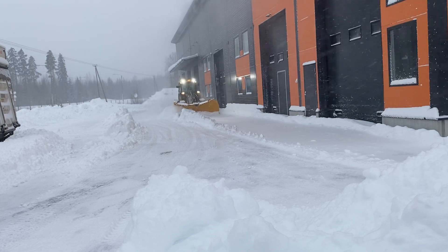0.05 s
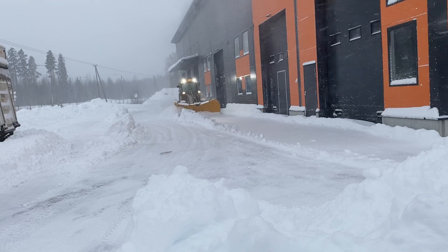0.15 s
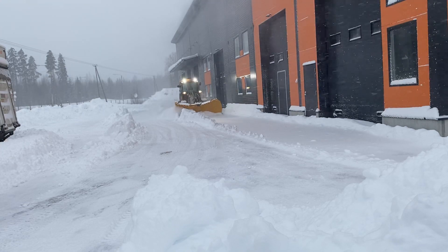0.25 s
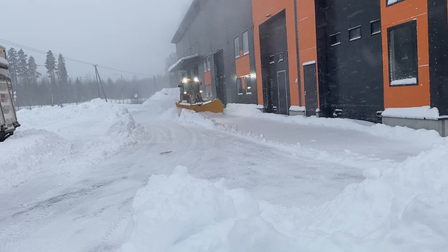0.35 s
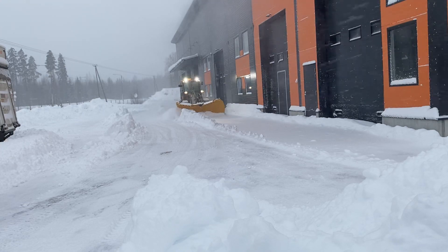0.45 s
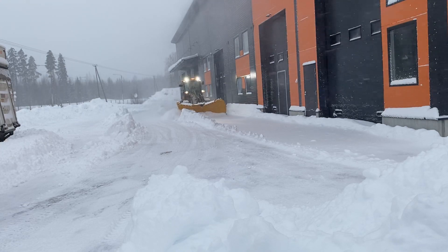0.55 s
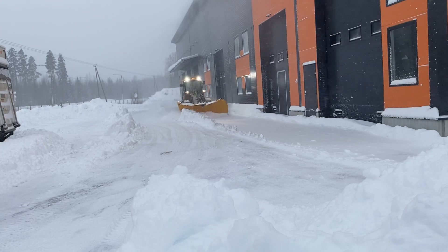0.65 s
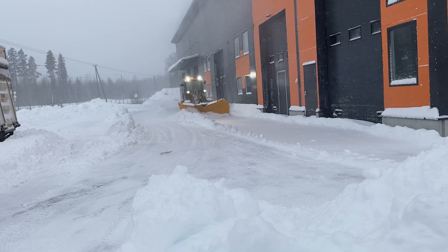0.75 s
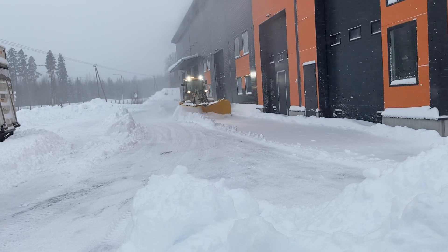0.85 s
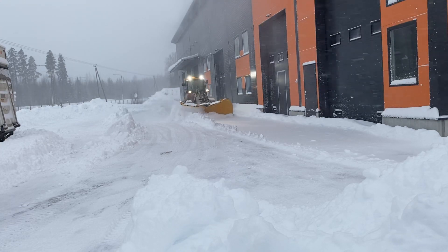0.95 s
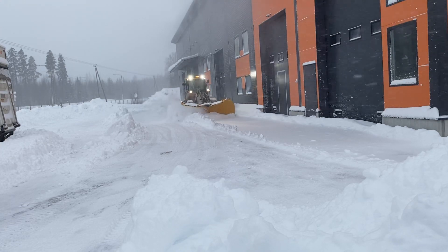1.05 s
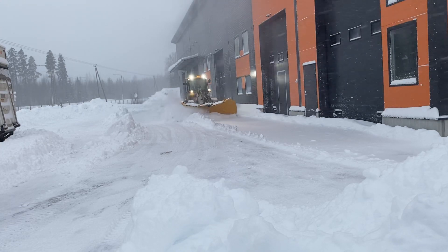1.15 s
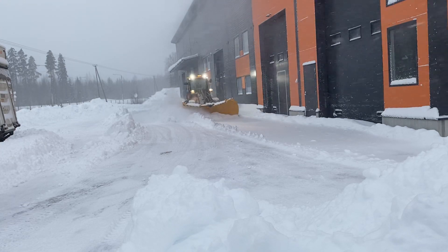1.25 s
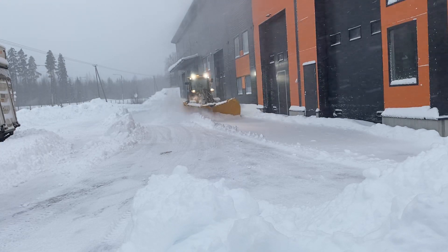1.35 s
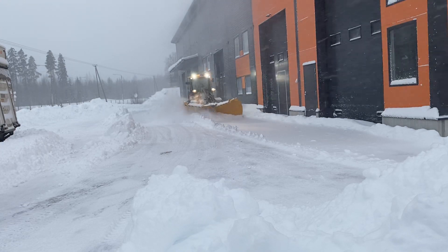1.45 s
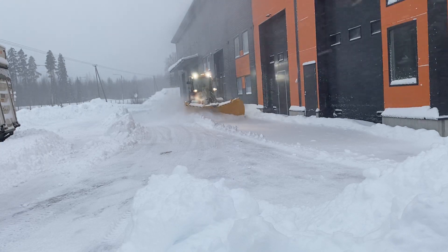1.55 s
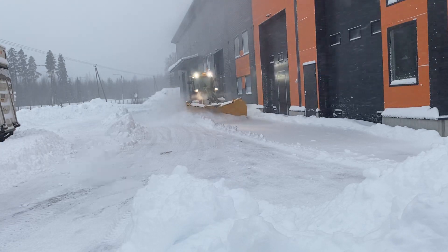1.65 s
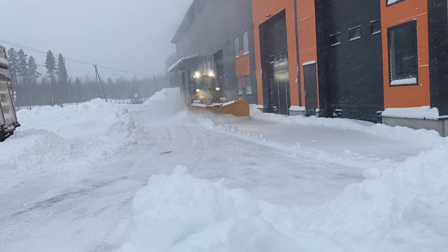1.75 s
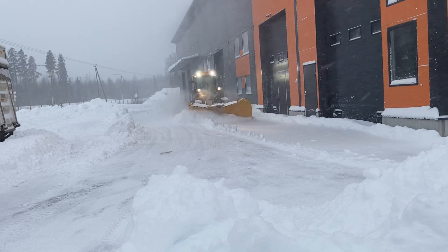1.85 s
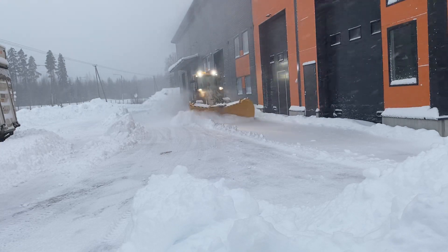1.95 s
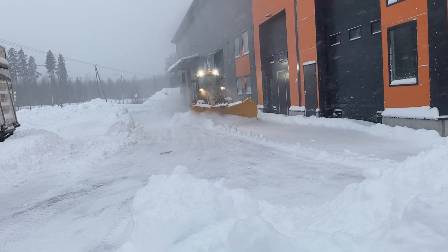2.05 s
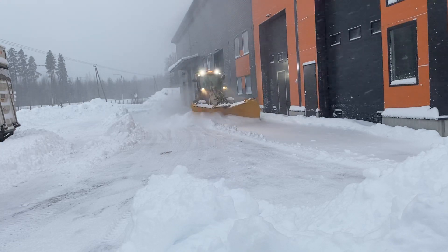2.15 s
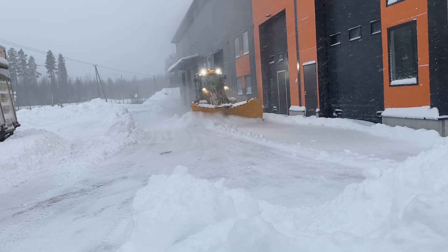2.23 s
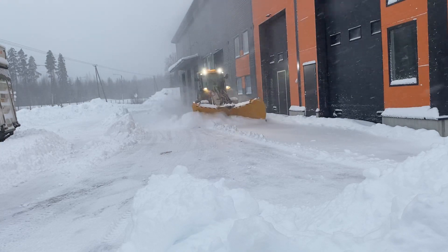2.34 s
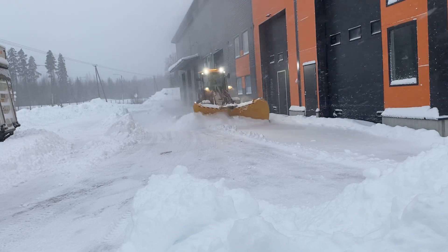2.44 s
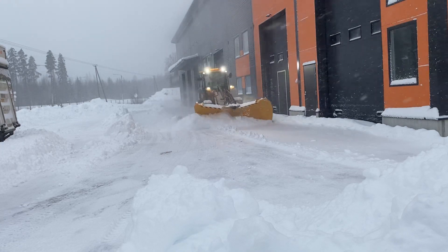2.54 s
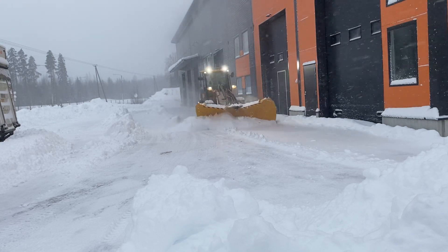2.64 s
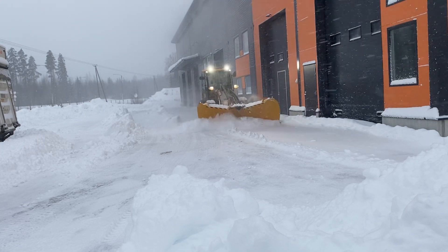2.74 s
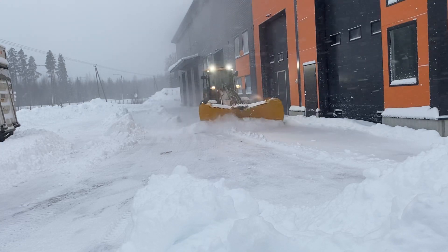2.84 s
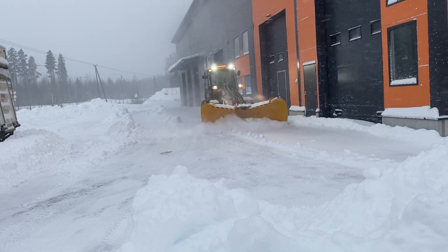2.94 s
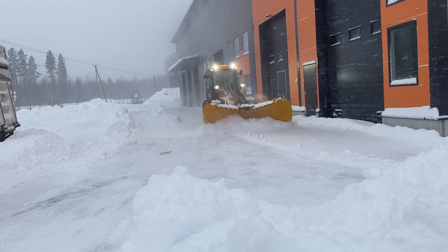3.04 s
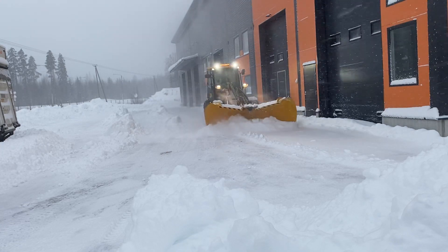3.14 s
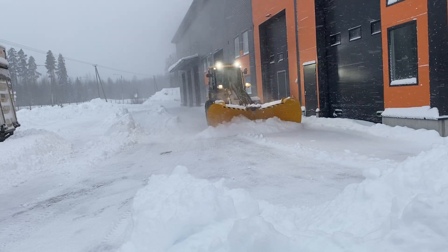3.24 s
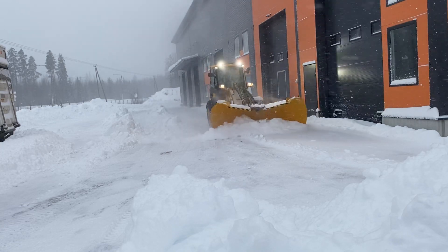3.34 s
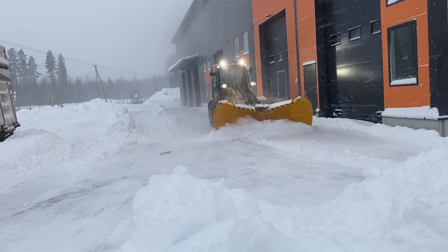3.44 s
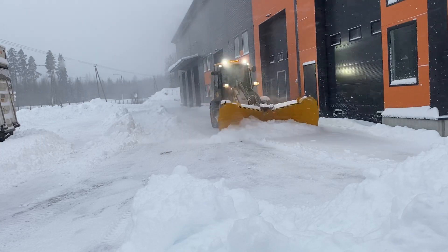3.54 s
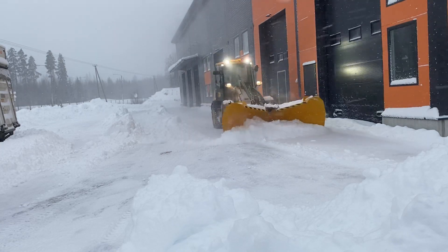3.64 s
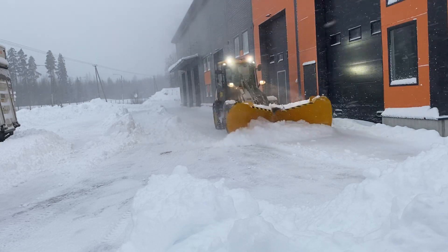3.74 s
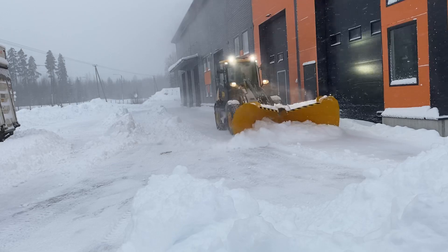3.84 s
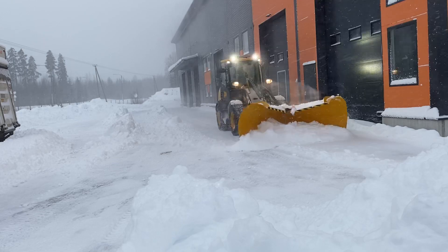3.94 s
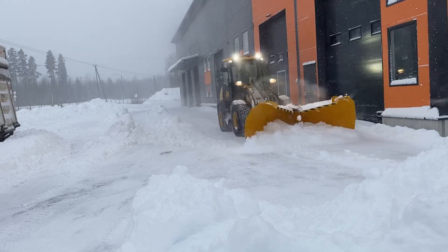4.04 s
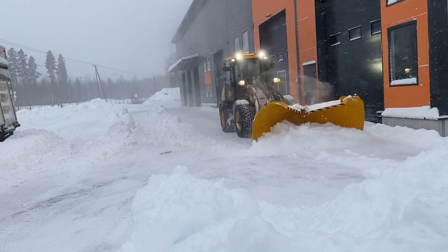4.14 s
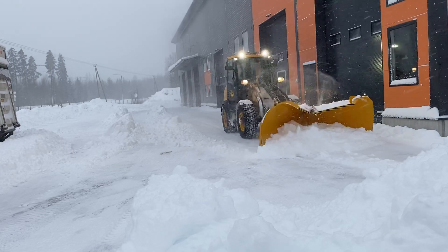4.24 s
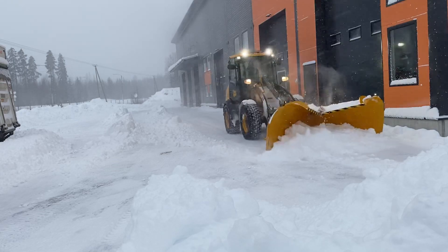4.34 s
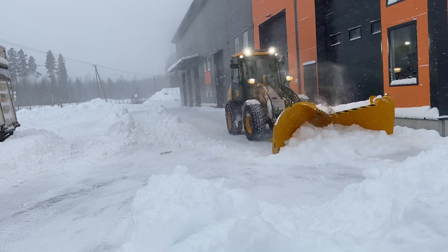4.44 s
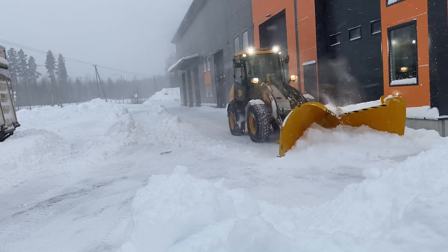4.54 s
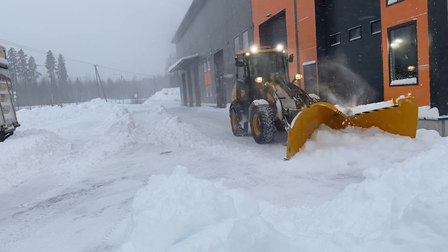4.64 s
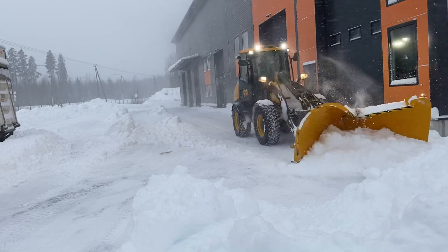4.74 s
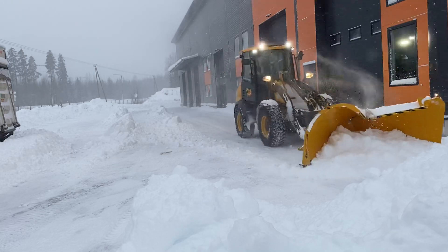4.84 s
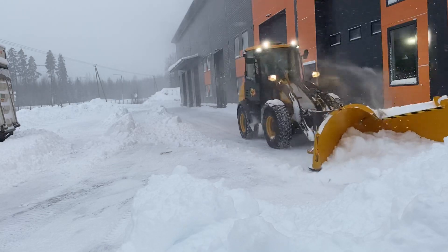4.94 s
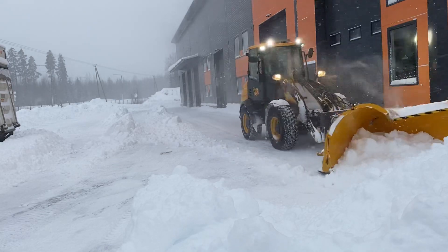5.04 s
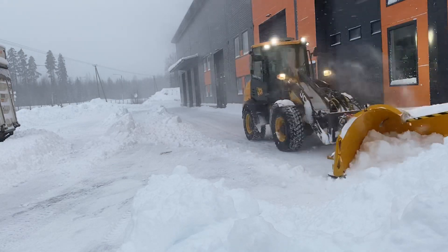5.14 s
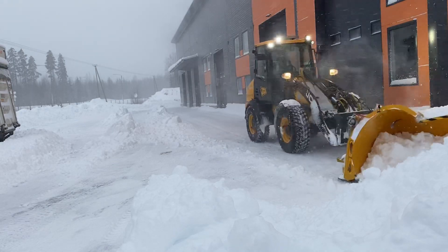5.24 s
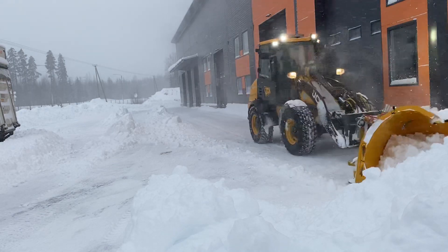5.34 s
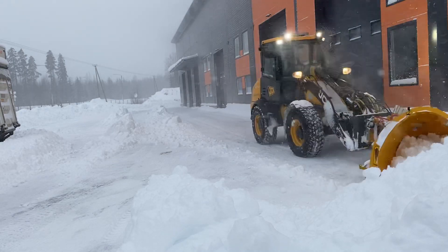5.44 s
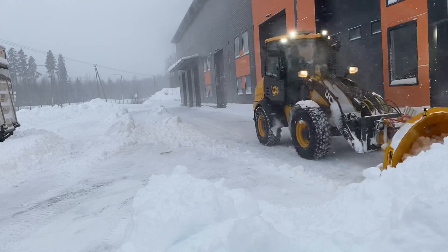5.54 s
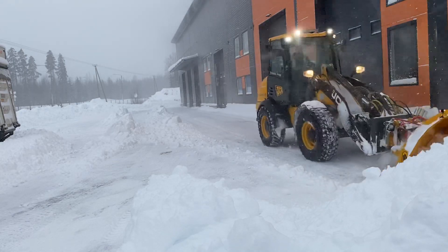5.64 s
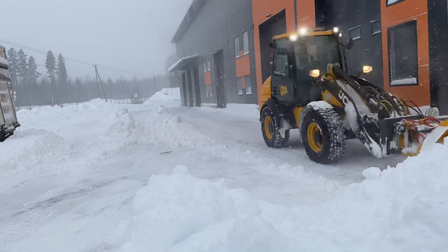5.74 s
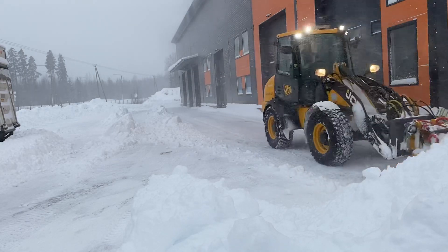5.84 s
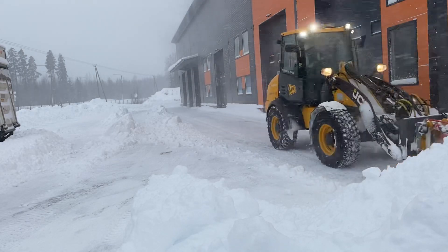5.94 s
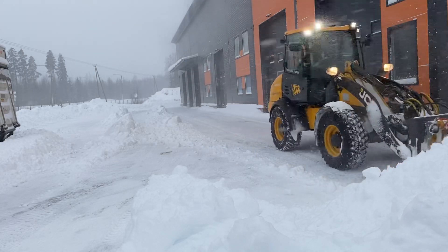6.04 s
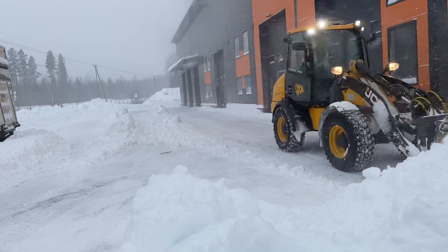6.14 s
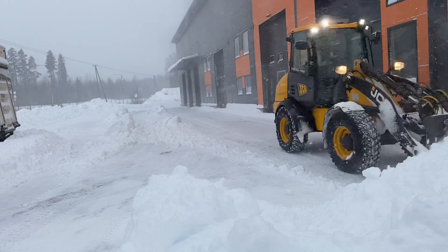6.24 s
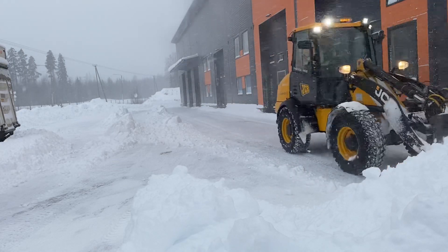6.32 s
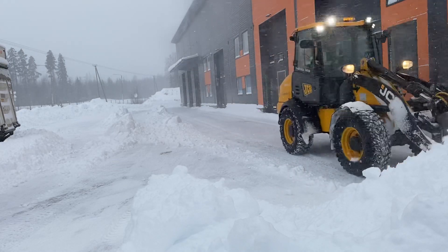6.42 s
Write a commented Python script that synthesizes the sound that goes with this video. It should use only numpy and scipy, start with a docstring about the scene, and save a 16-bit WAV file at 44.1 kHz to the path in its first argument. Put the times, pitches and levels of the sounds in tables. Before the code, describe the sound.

Wind rumbles and pops on a hand-held microphone while a distant plough scrapes softly across ice. The loader comes nearer, its rough edge noise swelling with gritty crackle and snow hiss. Hollow clanks, dull thuds and bright link rattles become dense around the middle and continue beside the listener. Finally only fading scraping, a lower diesel throb, thin hydraulic whine and light gusts remain in the open yard.

```python
"""Wheel loader ploughing a frozen yard

A wheel loader pushes a steel snow blade towards a hand-held camera and slows beside it.
The blade is noise stuttering over ice: it grinds, crackles, knocks and rattles through resonances of the steel.
The diesel drones as orders of its firing rate under a puffed roar, and its pump whines as sines.
Wind noise, short flutters and falling swings buffet the two microphone ports.
"""
import sys
import numpy as np
from scipy import signal
from scipy.fft import rfft, irfft
from scipy.io import wavfile
from scipy.ndimage import uniform_filter1d

SR = 44100
rng = np.random.default_rng(int(sys.argv[2]) if len(sys.argv) > 2 else 0)


def master_out(mix):
    """Clip the mix to full scale and print it as 16-bit PCM to the path in sys.argv[1]."""
    frames = np.transpose(np.atleast_2d(mix))
    ceiling = np.clip(frames, -1, 1)
    pcm = np.round(ceiling * 32767).astype(np.int16)
    wavfile.write(sys.argv[1], SR, pcm)


N = 285768  # samples, 6.48 s


def amp(db):
    """Decibels to gain."""
    return 10 ** (np.asarray(db) / 20)


def evened(x):
    """Scales to rms 1."""
    return x / np.sqrt(np.mean(x ** 2) + 1e-20)


def columns(rows):
    """Curve columns of a timed table, at every sample."""
    s, *values = np.transpose(rows)
    return [np.interp(np.arange(N) / SR, s, v) for v in values]


def coloured(x, points):
    """Gives x the spectrum of a (Hz, dB) table, rms 1."""
    f, db = np.transpose(points)
    hz = np.fft.rfftfreq(N, 1 / SR)
    gain = amp(np.interp(np.log(hz + 1), np.log(f + 1), db, -90, -90))
    return evened(irfft(rfft(x) * gain, N))


def lumps(per_s, channels=1):
    """Smooth chance of rms 1 that turns about per_s times a second."""
    span = max(round(SR / per_s / 2), 1)
    smooth = uniform_filter1d(rng.standard_normal((channels, N)), span)
    return evened(uniform_filter1d(smooth, span))


def resonate(x, hz, width):
    """Two-pole resonance of gain 1."""
    return signal.lfilter(*signal.iirpeak(hz, hz / width, SR), x)


def glide(x, hz, width):
    """A resonance that follows the curve hz: shift down, smooth twice, shift back."""
    turn = np.exp(2j * np.pi * np.cumsum(hz) / SR)
    r = np.exp(-np.pi * width / SR)
    return 2 * (turn * signal.lfilter([(1 - r) ** 2], [1, -2 * r, r * r], x / turn)).real


def bandpass(order, low_hz, high_hz):
    """Butterworth band-pass sections."""
    return signal.butter(order, (low_hz, high_hz), "band", fs=SR, output="sos")


def add(mix, s, sound):
    """Mixes a two-row sound in at time s."""
    part = mix[:, round(s * SR):][:, :sound.shape[1]]
    part += sound[:, :part.shape[1]]


def sides(pan_db):
    """Left and right gains from left minus right dB."""
    return amp(np.array([[.5], [-.5]]) * pan_db)


# the push across the yard, before mix gains: start_s, scrape_db, rumble_db, hiss_db
PUSH = [(0, -45.5, -51, -64), (.45, -42.5, -53, -58), (.74, -43.5, -64, -57), (1.05, -43, -40.5, -57),
        (1.17, -38.5, -42, -55), (1.25, -37.5, -41, -61), (1.32, -39.5, -44.5, -58),
        (1.42, -35.5, -37.5, -50), (1.52, -32, -33.5, -52.5), (1.66, -41.5, -45.5, -53.5),
        (2.09, -40, -44, -52), (2.3, -35, -37, -45.5), (2.45, -42.5, -39.5, -51), (2.69, -35, -35.5, -48),
        (2.85, -39.5, -37.5, -52), (3, -31.5, -36.5, -50.5), (3.25, -38.5, -37, -43.5),
        (3.48, -33.5, -35.5, -42.5), (3.75, -27.5, -29, -41.5), (3.9, -29.5, -27.5, -38),
        (4.06, -31.5, -34.5, -49), (4.35, -31.5, -29.5, -48.5), (4.56, -39, -36, -50),
        (4.71, -34, -34, -46), (4.88, -40.5, -28.5, -50), (4.96, -44, -38, -57), (5.07, -29, -33, -48),
        (5.22, -38.5, -31.5, -53), (5.33, -35, -44, -52), (5.45, -37.5, -37.5, -51),
        (5.62, -43, -42, -56.5), (6.06, -41.5, -45.5, -59), (6.2, -47, -41, -54), (6.48, -44, -43, -52.5)]
# spectra of blade rumble, edge scrape and snow hiss: pitch_hz, level_db (relative, per Hz)
RUMBLE = [(88, -21), (150, 6), (204, 0), (541, 2.5), (678, -2), (889, -10), (965, -11.5), (1300, -13),
          (1690, -98), (2860, -120)]
SCRAPE = [(410, -48), (700, 7.5), (1060, -5), (1130, -4.5), (1380, -4.5), (1500, -2), (1630, -1),
          (1760, -0.5), (1900, -1.5), (2520, -12), (3250, -12), (4200, -19.5), (5460, -32), (9240, -120)]
HISS = [(2200, 11.5), (3200, 4), (5000, 4), (5800, -3), (7000, -2), (9000, -8), (12000, -11.5),
        (13000, -17), (15000, -26), (16500, -42)]
# the blade turning side-on: start_s, upper_ring_db (relative), thud_hz
SIDE_ON = [(0, -40, 760), (2.2, -3, 730), (3.5, -24, 714), (4.1, -22, 799.4), (4.6, -6.5, 707.2),
           (5.0, -9, 590), (5.3, -3, 565), (5.6, -10, 600), (5.9, -16, 620), (6.48, -28, 645)]
HOLLOW_HZ = 1290  # centre of a wandering resonance
UPPER_HZ, UPPER_WIDTH_HZ = 2410, 910


def upper_ring(x):
    """The blade's broad upper resonance, passed twice."""
    once = resonate(x, UPPER_HZ, UPPER_WIDTH_HZ)
    return resonate(once, UPPER_HZ, UPPER_WIDTH_HZ)


def grind():
    """The edge stutters over ice, more roughly the harder it bites; the curved steel colours the scrape and rings."""
    scrape_db, rumble_db, hiss_db = columns(PUSH)
    bite = np.clip((scrape_db + 48.5) / 14, .1, 1)
    slip = bite * (lumps(20.6) + 0.16 * lumps(97))
    rumble_swell = amp(2.4 * slip + 1.27 * bite * lumps(38))
    rumble = coloured(rumble_swell * rng.standard_normal((2, N)), RUMBLE)

    # ice lumps crushed one by one, about 90 a second
    crumbs = amp(4.15 * np.minimum(rng.exponential(1, N), 4)) * (rng.random(N) < 90 / SR)
    crunch = signal.lfilter([1], [1, -np.exp(-1 / (0.0097 * SR))], crumbs)
    scrape_swell = (1 + 0.24 * bite * crunch) * amp(1.54 * slip)
    scrape = coloured(scrape_swell * rng.standard_normal((2, N)), SCRAPE)

    ring = evened(blade_ring(scrape + rumble))
    hollow = evened(glide(scrape, HOLLOW_HZ * (1 + 0.036 * lumps(2.8)[0]), 690))
    upper = amp(columns(SIDE_ON)[0]) * evened(upper_ring(scrape))

    grit = amp(1.1 * np.minimum(rng.exponential(1, N), 4)) * (rng.random(N) < .15)
    hiss_swell = amp(1.9 * slip + 1.44 * lumps(22)) * grit * (1 + 0.3 * bite * crunch)
    hiss = coloured(hiss_swell * rng.standard_normal((2, N)), HISS)

    steel = 0.5 * scrape + 0.15 * ring + 0.29 * hollow + 0.28 * upper
    return amp(rumble_db) * rumble + amp(scrape_db) * steel + 0.78 * amp(hiss_db) * hiss


# modes of the steel blade: pitch_hz, width_hz (at least 25 is used), level_db (relative)
BLADE = [(701.6, 43, 5), (890, 15, 5), (1157, 45, 5.5), (1350, 31, -7), (1732, 34, 4), (1950, 63, 0),
         (2367, 110, -3.5)]
FLEX = .018  # rms share by which each mode drifts


def blade_ring(x):
    """The blade's modes drift apart at random, as steel flexing under load."""
    return sum(amp(db) * glide(x, hz * (1 + FLEX * lumps(5.6)[0]), max(width, 25))
               for hz, width, db in BLADE)


def crackle():
    """Grit snaps under the edge; each grain pings briefly at one of many pitches."""
    size = amp(3.9 * np.minimum(rng.exponential(1, N), 4)) * (rng.random(N) < 260 / SR)
    pitches, t, out = np.geomspace(1800, 7400, 24), np.arange(900) / SR, np.zeros((2, N))
    which = rng.integers(0, len(pitches), N)
    for k, hz in enumerate(pitches):
        ping = np.sin(2 * np.pi * hz * t) * amp(-60 * t / 0.064 - 9.1 * np.log2(hz / 4000))
        grains = signal.oaconvolve(size * (which == k), ping)[:N]
        out += grains * rng.uniform(-1.4, 1, (2, 1))
    return amp(columns(PUSH)[2] - 10.0) * evened(out * amp(1.1 * lumps(6.1)))


# the edge catches on ice, levels before mix gains: start_s, clank_db, clank_hz, thud_db (relative)
KNOCKS = [(0.9485, -28, 1540, -5), (.9819, -25.5, 1460, -2), (1.4109, -26.5, 1380, -14),
          (1.4452, -26, 1550, -18), (1.4697, -19.5, 1370, -25), (1.5848, -23, 1340, -1),
          (2.6201, -26, 1140, -2), (2.6706, -28, 1170, -22), (2.6975, -24, 1460, -25),
          (2.7659, -32, 1590, -15), (2.93, -27, 1180, 2), (3.0208, -16.5, 1200, -1.5),
          (3.0631, -24, 1420, -15), (3.097, -26, 1600, -23), (3.18, -28.5, 1440, -16),
          (3.2354, -21, 1400, -11), (3.3316, -25, 1104, -4), (3.351, -26, 1140, 5.5),
          (3.399, -27.5, 1340, -18), (3.4943, -24, 1880, -5), (3.565, -20, 1460, 1),
          (3.6222, -13, 1150, -0.5), (3.6788, -21.5, 1150, 3.5), (3.697, -19, 1350, 2.5),
          (3.7304, -13, 1110, 2), (3.7626, -14, 1470, -3), (3.811, -23, 1130, 3), (3.8426, -24, 1560, -13),
          (3.8753, -23, 1350, 9), (3.9498, -17.5, 1100, 1.5), (4.0648, -31, 1680, 5),
          (4.1, -13.5, 1710, -2), (4.1601, -24, 1611, -0.5), (4.2031, -26, 1400, 2), (4.2191, -29, 1820, 4),
          (4.25, -18.5, 1734, 3), (4.2967, -24, 1950, 5), (4.3444, -15, 1830, -1),
          (4.398, -19.5, 1840, 5.5), (4.452, -9.5, 1436, -9.5), (4.5572, -17, 1517, -4),
          (4.706, -18, 1620, -5), (4.8043, -20, 1380, 6), (4.8666, -20, 1300, 2),
          (4.9045, -25.5, 1318, 3.5), (4.963, -32, 1410, 0), (5.004, -25.5, 1900, 0),
          (5.057, -23.5, 2028, -20), (5.0722, -21.5, 1550, -8), (5.0916, -13.5, 1530, 2),
          (5.1285, -23.5, 1325, 8.5), (5.158, -16, 1441, -0.5), (5.181, -20.5, 1190, 12),
          (5.2481, -15.5, 1460, 5), (5.3483, -20, 1520, 4.5), (5.3928, -24.5, 1280, 6.5)]
# the blade swings to the right: start_s, pan_db (left minus right)
BLADE_PAN = [(0, -1), (4.4, 1), (4.7, -4.5), (6.48, -5)]
CHATTER_S, KNOCK_T60_S = 0.0095, 0.076  # the jolt's hold, then its 60 dB decay
BOUNCE_S = 0.0075  # from first strike to bounce
CRACK_FROM_DB, CRACK_DB = -13, -25  # clank level around which hardness sets in; gain before hardness
# opening ping: gain before hardness, decay, starting pitch over clank pitch
STRIKE_DB, STRIKE_S, STRIKE_ABOVE = 7, 0.0021, 1.44


def knocks():
    """A chattering jolt rings a clank, upper ring, thud and blade modes; hard ones crack more."""
    out, jolts, cracks = np.zeros((3, 2, N))
    t = np.arange(5000) / SR
    when, upper, thud = np.transpose(SIDE_ON)
    for s, db, hz, thud_db in KNOCKS:
        pan = sides(np.interp(s, *np.transpose(BLADE_PAN)))
        thud_hz = np.interp(s, when, thud)
        hard = 1 / (4.5 + np.exp((CRACK_FROM_DB - db) / 6.4))

        shape = amp(db - 60 * np.maximum(t - CHATTER_S, 0) / KNOCK_T60_S)
        shape = shape + 0.2 * amp(db) * np.exp(-t / 0.00076)
        jolt = pan * shape * rng.standard_normal((2, len(t)))
        jolt[:, 0] += 7.9 * hard * amp(db) * pan[:, 0]  # the first strike
        jolt[:, round(BOUNCE_S * SR)] -= 3.6 * hard * amp(db) * pan[:, 0]  # and its bounce

        clank = 1.7 * resonate(resonate(jolt, hz, 660), hz, 660) + 1.52 * resonate(jolt, hz, 49)
        top = amp(np.interp(s, when, upper)) * upper_ring(jolt)
        low = signal.sosfilt(bandpass(2, 0.66 * thud_hz, 1.317 * thud_hz), jolt)
        add(out, s, clank + top + 2.14 * amp(thud_db) * low)

        # the ping slides down to the clank's pitch
        turns = hz * np.cumsum(1 + (STRIKE_ABOVE - 1) * np.exp(-t / STRIKE_S)) / SR
        ping = np.sin(2 * np.pi * turns) * np.exp(-t / STRIKE_S)
        add(out, s, amp(db + STRIKE_DB) * hard * pan * ping)
        add(jolts, s, jolt)
        add(cracks, s, amp(CRACK_DB) * hard * jolt * np.exp(-t / 0.00073))
    out += blade_ring(jolts)
    body = signal.sosfilt(signal.butter(4, 3400, fs=SR, output="sos"), out)
    return body + signal.sosfilt(bandpass(2, 2400, 12000), cracks)


# loose steel links rattle, levels before mix gains: start_s, jingle_db, ring_hz, tick_db
RATTLES = [(0.688, -45, 4930, -58), (0.9817, -39, 3580, -80), (1.359, -43, 6300, -67),
           (1.469, -30, 3220, -62), (1.584, -43, 3570, -76), (1.8954, -28.5, 7200, -55),
           (2.0088, -33.5, 3940, -77), (2.109, -32, 7060, -66), (2.173, -46, 3900, -49.5),
           (2.244, -31, 4000, -56), (2.286, -31, 6900, -64), (2.297, -22.5, 4450, -59),
           (2.313, -28, 6900, -64), (2.33, -36, 6900, -68), (2.41, -46, 6900, -75), (2.457, -36, 6900, -75),
           (2.49, -35, 6900, -68), (2.708, -28, 6700, -53), (2.7794, -38, 3380, -50),
           (2.8733, -34, 3330, -48), (3.0092, -37, 3387, -45.5), (3.064, -41, 3220, -49),
           (3.18, -30, 4730, -51), (3.2082, -33, 4770, -57), (3.251, -27.5, 4730, -51),
           (3.2773, -26, 4690, -55), (3.322, -28.5, 3386, -52), (3.346, -23.5, 4130, -49),
           (3.413, -27, 4580, -46), (3.435, -29, 5000, -46.5), (3.4936, -16, 3810, -50),
           (3.509, -32, 3680, -62), (3.626, -26, 4510, -53), (3.671, -28.5, 3420, -44.5),
           (3.694, -21, 3400, -47), (3.7623, -24, 3630, -65), (3.7877, -21.5, 5050, -51),
           (3.8403, -17, 4480, -48), (3.852, -22, 5070, -53), (3.924, -25.5, 4170, -53),
           (3.993, -33, 5030, -59), (4.008, -31, 4560, -46.5), (4.016, -29, 4605, -59),
           (4.05, -32, 4396, -52), (4.1, -20, 3350, -68), (4.111, -39, 4480, -65), (4.2147, -44, 4200, -52),
           (4.241, -25, 4056, -52), (4.26, -27.5, 4900, -47.5), (4.2947, -28, 3600, -66),
           (4.305, -38, 4500, -48.5), (4.33, -30, 3600, -64), (4.3409, -26, 4300, -47.5),
           (4.349, -23.5, 3630, -69), (4.3973, -29, 3844, -70), (4.4261, -44, 4270, -66),
           (4.451, -17.5, 3050, -73), (4.461, -35, 5180, -72), (4.555, -34, 3990, -54),
           (4.706, -31, 3950, -66), (4.7446, -27, 3597, -44), (4.783, -32, 4580, -66),
           (4.8674, -54, 3656, -47), (5.074, -42, 3230, -52), (5.089, -28, 4100, -56),
           (5.15, -29, 3960, -65), (5.18, -35, 3900, -59), (5.316, -32, 4570, -65), (5.342, -29, 4520, -56)]
# what the loose links ring with: pitch_hz, width_hz, level_db (relative, before chance)
LINKS = [(3330, 220, -1), (3900, 230, -4.5), (4480, 310, -4), (4900, 110, -6), (6300, 160, -5),
         (6700, 180, -11), (7100, 200, -7)]
JINGLE_HOLD_S, RATTLE_T60_S = 0.0032, 0.076  # the burst's hold, then its 60 dB decay
TICK_S = 0.0028  # decay constant of the tick's accent


def rattles():
    """Short bright bursts ring the links, each mode more or less by chance, with a tick above."""
    out, t = np.zeros((2, N)), np.arange(4000) / SR
    low, high = bandpass(3, 2800, 7430), bandpass(3, 7600, 12400)
    link_hz = np.transpose(LINKS)[0]
    for s, db, hz, top_db in RATTLES:
        rise_s = np.interp(max(db, top_db + 22), (-30, -21), (.004, .0004))  # light touches start softly
        decay = amp(-60 * np.maximum(t - JINGLE_HOLD_S, 0) / RATTLE_T60_S)
        burst = decay * rng.standard_normal((2, 2, len(t))) * np.minimum(t / rise_s, 1)
        # modes near this rattle's ring lead
        chance_db = 2.0 * rng.standard_normal(len(LINKS)) - 15.0 * abs(np.log2(link_hz / hz))
        modes = sum(amp(m_db + c) * resonate(burst[0], f, w) for (f, w, m_db), c in zip(LINKS, chance_db))
        raw = (0.19 + 0.2 * np.exp(-t / 0.0016)) * burst[0]
        jingle = signal.sosfilt(low, raw + 0.96 * modes + 0.5 * resonate(burst[0], hz, 370))
        tick = signal.sosfilt(high, burst[1] * (0.4 + 4.5 * np.exp(-t / TICK_S)))
        add(out, s, amp(db) * jingle + 1.43 * amp(top_db) * tick)
    return out


# deep thumps, perhaps wind or the blade dropping:
# middle_s, peak_db, pitch_hz (at the middle), half_length_s, fall_hz_per_s
THUMPS = [(3.9845, -16, 62, .017, 300), (5.2662, -9, 285, .0037, 28000)]


def thumps():
    """Rounded swings that drop in pitch, alike on both sides."""
    out = np.zeros(N)
    for s, db, hz, half, fall in THUMPS:
        t = np.clip(np.arange(N) / SR - s, -.08, .08)
        out += amp(db) * np.exp(-(t / half) ** 2) * np.cos(2 * np.pi * (hz - fall * t / 2) * t)
    return out


# the diesel, levels before mix gains: start_s, firing_hz, thud_db, overtones_db, whine_db, roar_db
ENGINE = [(0, 64.6, -36, -62, -63, -52), (.3, 64.87, -51, -61, -48, -54),
          (1, 63.13, -43, -48.5, -47.5, -46.5), (1.35, 64.56, -35.5, -74, -47, -48.5),
          (1.8, 65.25, -45, -48, -55, -41), (2.15, 65.85, -37, -48, -61, -41),
          (2.3, 61.5, -39, -45.5, -57, -38.5), (2.7, 61, -35, -38, -64, -37.5),
          (3.13, 60.86, -42, -37.5, -44, -37), (3.7, 56.32, -62, -51, -64, -35),
          (4.2, 52.9, -48, -38.5, -41, -40), (5, 51.2, -44, -53, -41, -34.5),
          (5.4, 50.2, -60, -69, -53, -38.5), (5.8, 49.28, -56, -51, -72, -40.5),
          (6.02, 49.1, -50, -42.5, -60, -41), (6.2, 48.75, -41, -46.5, -58, -37.5),
          (6.33, 50.2, -45, -41, -55, -37), (6.4, 51.2, -39, -36, -31, -36),
          (6.48, 51.4, -28, -32.5, -33, -34.5)]
# exhaust overtones: multiple of firing rate, level_db (relative)
OVERTONES = [(2, -5), (3, 0), (5, -14), (6, -8), (7, -9), (12, -27)]
# pump whine: multiple of firing rate, level_db (relative)
PISTONS = [(9, -4.5), (18, -24), (27, -16)]
# roar spectrum: pitch_hz, level_db (relative, per Hz)
ROAR = [(30, -28), (60, 3.5), (200, -15), (600, -21.5), (950, -17), (1300, -22.5), (2000, -25),
        (2900, -44.5), (6000, -44.5), (11000, -46.5), (16000, -55)]


def engine():
    """Wavering orders of the firing rate, the pump's whine, and a roar puffed at each firing."""
    hz, thud_db, tones_db, whine_db, roar_db = columns(ENGINE)
    turns = np.cumsum(hz * (1 + 0.004175 * lumps(5.72)[0])) / SR  # firings so far

    def order(k, db):
        """A sine at k times the firing rate, its level wavering."""
        level = amp(db + 1.3 * lumps(7)[0])
        return level * np.sqrt(2) * np.sin(2 * np.pi * (k * turns + rng.random()))

    tones = order(1.0, thud_db) + sum(order(k, tones_db + db) for k, db in OVERTONES)
    whine = sum(order(k, whine_db + db) for k, db in PISTONS)
    puffs = (0.97 + np.exp(-(turns % 1) / 1.4)) * rng.standard_normal((2, N))
    # one combustion knock a firing
    knock = evened(np.diff(np.floor(turns), prepend=0) * amp(3.4 * lumps(40)[0]))
    return tones, whine, amp(roar_db) * coloured(puffs + .5 * knock, ROAR)


# thin tones, probably the hydraulics, before mix gains: start_s, end_s, pitch_hz, level_db
TONES = [(.25, .8, 1160, -55), (.3, .75, 1445, -57), (1.15, 1.65, 1565, -53), (1.35, 1.65, 440, -45),
         (1.7, 2.25, 1778, -54), (2.3, 2.95, 568, -50), (4.1, 4.5, 690, -43), (5.85, 6.1, 292, -48),
         (5.5, 6.3, 843, -52), (5.5, 6.15, 750, -51), (6.05, 6.4, 587, -48), (5.3, 5.45, 512, -44)]


def hydraulics():
    """Thin tones swell, waver a little and fade."""
    out, waver, flutter = np.zeros((1, N)), lumps(11)[0], lumps(16)[0]
    for start, end, hz, db in TONES:
        span = slice(round(start * SR), round(end * SR))
        turns = np.cumsum(hz * (1 + .006 * waver[span])) / SR
        tone = amp(db + 2.0 * flutter[span]) * np.sqrt(2) * np.sin(2 * np.pi * turns)
        add(out, start, tone[None] * signal.windows.tukey(len(turns), .4))
    return out[0]


# whir from the engine bay: start_s, level_db
WHIR = [(0, -67), (.3, -61), (.7, -59), (1.1, -62), (1.6, -63), (2.4, -65), (6.48, -67)]


def whir():
    """A wavering band of noise from the engine bay."""
    hz = 2620 * (1 + .012 * lumps(5.0)[0])
    level = amp(columns(WHIR)[0] + 1.8 * lumps(13.0))
    return level * evened(glide(rng.standard_normal((2, N)), hz, 190))


# the steady wind level, on which the short swells ride: start_s, level_db
WIND_LEVEL = [(0, -34.5), (.23, -38), (.4, -35), (.52, -40), (.9, -33.5), (1.25, -46.5), (1.5, -36),
              (1.75, -35.5), (2.5, -32.5), (3.1, -33.5), (3.6, -34.5), (4.2, -34), (4.6, -35.5),
              (4.85, -34), (4.98, -43), (5.5, -43), (5.85, -43), (6.2, -35), (6.48, -36.5)]
# short swells added to the wind level, some very faint: middle_s, level_db, length_s
SWELLS = [(0.127, -30, 0.11), (0.176, -39, 0.13), (0.296, -22.5, 0.037), (0.37, -35.5, 0.086),
          (0.75, -40, 0.044), (0.858, -56, 0.07), (1.13, -33.5, 0.042), (1.474, -30, 0.11),
          (1.88, -38, 0.093), (2.101, -35, 0.016), (3.076, -34, 0.054), (3.307, -32, 0.047),
          (3.403, -25, 0.085), (3.79, -39, 0.071), (3.908, -26, 0.02), (3.998, -30, 0.04),
          (4.37, -39, 0.04), (4.572, -24, 0.11), (4.827, -34.5, 0.16), (5.031, -27, 0.043),
          (5.184, -34, 0.064), (5.263, -21.5, 0.033), (5.355, -32.5, 0.028), (5.54, -34, 0.033),
          (5.82, -34, 0.087), (6.207, -45, 0.039)]
# wind spectrum at the microphone: pitch_hz, level_db (relative, per Hz)
WIND = [(20, -37), (35, -11.5), (55, 1), (100, -2.5), (180, -7.5), (300, -16), (600, -21), (1200, -36)]
# single buffets, before shaping: start_s, level_db, pitch_hz (nominal), pan_db (left minus right)
BUFFETS = [(.058, -21, 330, 4), (0.093, -17, 200, 8), (0.126, -24, 356, -3), (0.144, -23.5, 157, 15),
           (0.19, -22.5, 307, -2), (.203, -30, 150, 2), (0.285, -23.5, 148, 10), (0.297, -23, 149, -2),
           (0.341, -28, 226, 11), (0.389, -21, 233, 6), (0.704, -18, 200, 5), (.737, -29, 220, 0),
           (0.748, -22, 210, 0), (0.797, -23.5, 220, 11), (0.825, -31, 251, 6), (.85, -24, 260, 8),
           (.93, -22.5, 200, 8), (.99, -27, 209, 8), (1.103, -23, 243, 9), (1.123, -17, 208, 3),
           (1.431, -18.5, 172, 3), (1.505, -16, 360, 3), (1.846, -25, 176, 12), (1.89, -19, 203, 3),
           (2.091, -25, 200, 19), (2.535, -19.5, 312, 5), (2.906, -15.5, 174, 8), (2.982, -15.5, 170, 5),
           (3.054, -15.5, 174, 6), (3.281, -12.5, 162, 6), (3.374, -19, 304, 10), (3.4, -10.5, 247, -1),
           (3.469, -21, 176, 5), (4.516, -17, 154, -1), (4.533, -16.5, 177, 0), (4.585, -17, 201, -2),
           (4.645, -12.5, 168.8, -5), (4.66, -18, 200, 6), (4.686, -13.5, 297, 0), (5.019, -21, 149, -9),
           (5.271, -23, 168, 4), (5.527, -24, 337.5, -6), (5.793, -31, 171.4, -1), (6.193, -31, 183, -5),
           (6.353, -22.5, 151.7, -5), (6.447, -22.5, 151, -17)]
# how much the buffets flutter: start_s, level_db (relative)
FLUTTER = [(0, -7), (.45, -7), (.65, -15), (1.3, -14), (6.48, -10)]
BUFFET_T60_S = 0.046  # 60 dB decay of the swing


def wind():
    """Lumpy turbulence, partly separate at each port, and buffets: a quick flutter and a falling swing."""
    shared, own = rng.standard_normal(N), rng.standard_normal((2, N))
    eddies = amp(1.8 * lumps(29) + 2.15 * lumps(63, channels=2)) * (shared + 0.56 * own)
    now = np.arange(N) / SR
    swells = sum(amp(db) * np.exp(-((now - s) / (length / 2)) ** 2) for s, db, length in SWELLS)
    out = (amp(columns(WIND_LEVEL)[0]) + swells) * coloured(eddies, WIND)

    t = np.arange(3000) / SR
    band = bandpass(3, 300, 900)
    for s, db, hz, pan_db in BUFFETS:
        # falls from over twice the nominal pitch to under 0.6 of it, a little apart on each side
        pitch = hz * (0.6 + 1.7 * np.exp(-t / 0.007)) * rng.uniform(0.92, 0.98, (2, 1))
        swing = np.sin(2 * np.pi * np.cumsum(pitch, 1) / SR)
        swing = swing * np.minimum(t / 0.0048, 1) * amp(-60 * t / BUFFET_T60_S)
        common, left, right = rng.standard_normal((3, len(t))) * t * np.exp(-t / 0.0028)
        flutter = signal.sosfilt(band, common + .5 * np.array([left, right]))
        flutter_gain = amp(np.interp(s, *np.transpose(FLUTTER)))
        buffet = 0.91 * swing + flutter_gain * flutter / abs(flutter).max()
        add(out, s, amp(db) * sides(pan_db) * buffet)
    return out


# two microphone ports: pitch_hz, likeness (0-1), left_lead_rad, pan_db (left minus right)
PORTS = [(60, .88, 0, 0), (300, .88, -.35, -1), (700, .85, -.4, -4.5), (1500, .92, -.62, -2),
         (3000, .75, .4, -.5), (5000, .5, .8, 0), (7300, .75, 0, 0), (8400, .88, -3.1, 0),
         (11000, .86, -6.3, 0), (12600, .88, -8.8, 0), (14300, .88, -10, 0), (15600, .9, -12.5, 0)]


def ports(pair):
    """The right port hears a phase-turned share of the left, the rest by other paths."""
    f, *values = np.transpose(PORTS)
    hz = np.fft.rfftfreq(N, 1 / SR)
    same, lead, pan_db = (np.interp(np.log(hz + 1), np.log(f + 1), v) for v in values)
    same = np.clip(same, 0, 1)
    direct, other = rfft(pair)
    right = same * np.exp(-1j * lead) * direct + np.sqrt(1 - same ** 2) * other
    return irfft(np.array([direct, right]) * sides(pan_db), N)


def scene():
    """Machine through the ports, low engine orders alike on both sides, the whines stronger on the left."""
    tones, whine, roar = engine()
    machine = ports(roar + whir() + grind() + crackle() + knocks() + rattles())
    whines = (whine + hydraulics()) * np.array([[1.3], [.6]])
    return machine + tones + thumps() + whines + wind()


EDGE_HZ = 16000  # low-pass cutoff


def record(dry):
    """The upper band limit, a symmetric low-pass."""
    lowpass = signal.firwin(511, EDGE_HZ, window=("kaiser", 9), fs=SR)
    return signal.oaconvolve(dry, lowpass[None], "same")


dry = scene()
out = record(dry)
master_out(out)
```